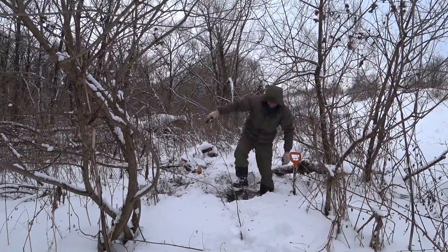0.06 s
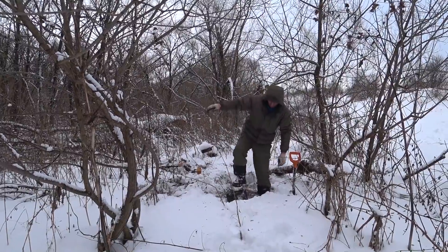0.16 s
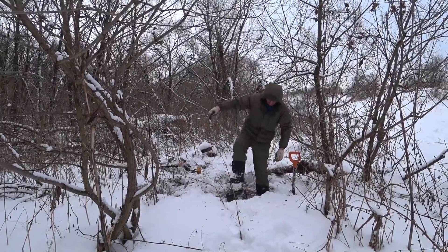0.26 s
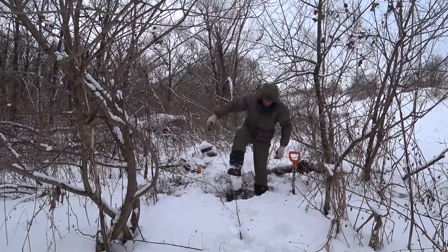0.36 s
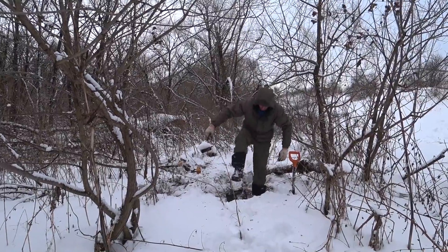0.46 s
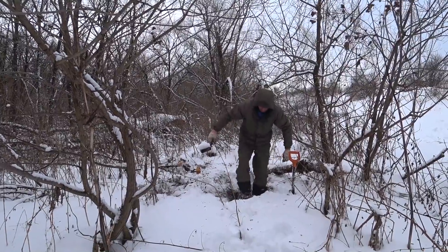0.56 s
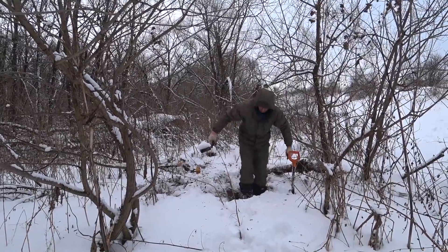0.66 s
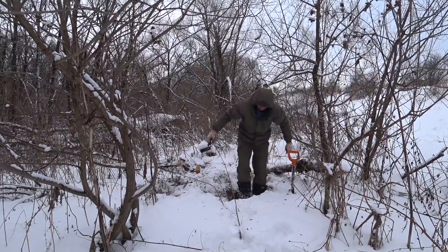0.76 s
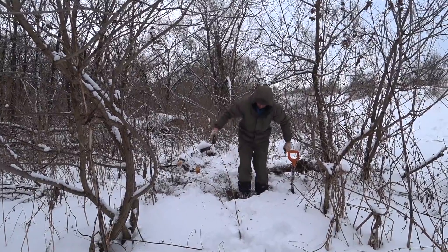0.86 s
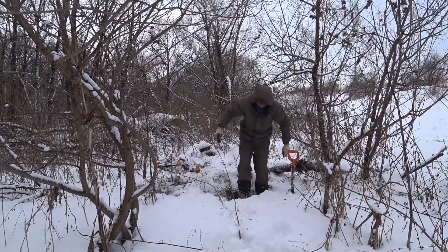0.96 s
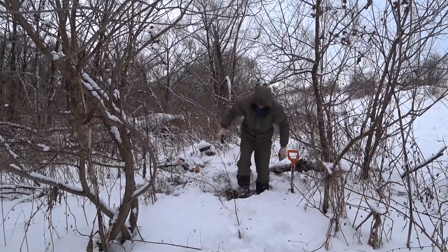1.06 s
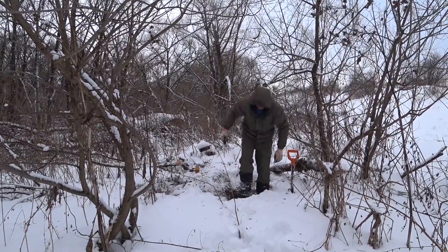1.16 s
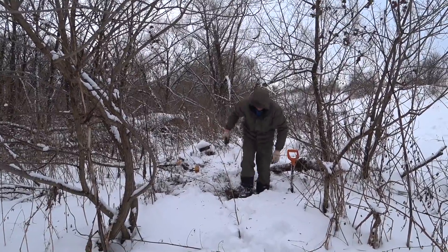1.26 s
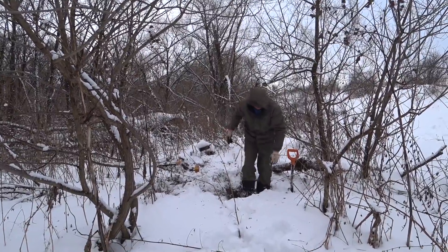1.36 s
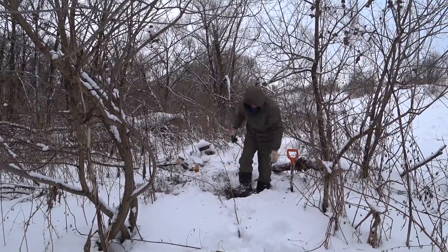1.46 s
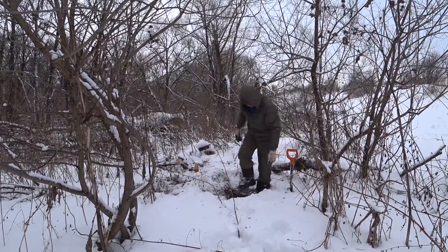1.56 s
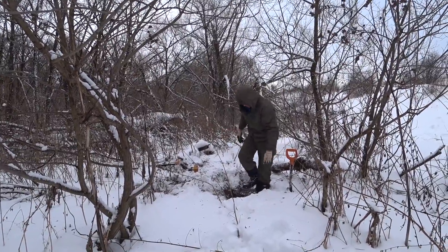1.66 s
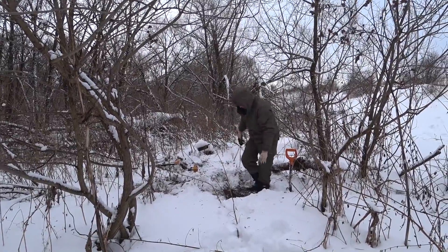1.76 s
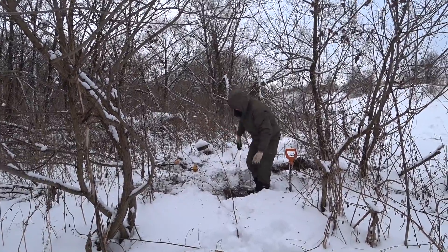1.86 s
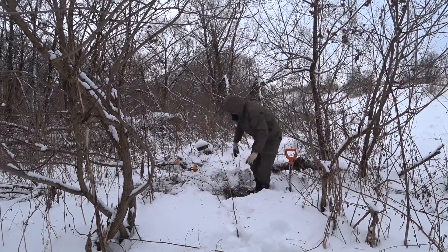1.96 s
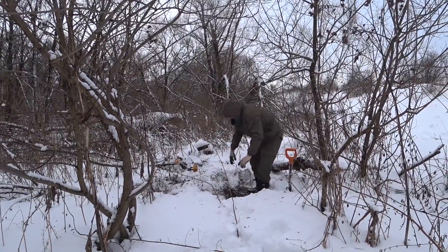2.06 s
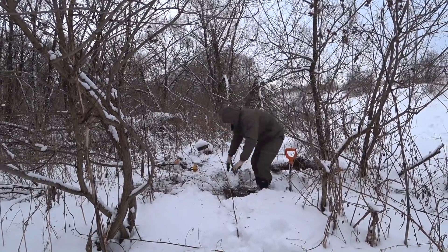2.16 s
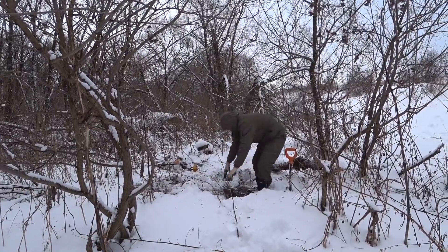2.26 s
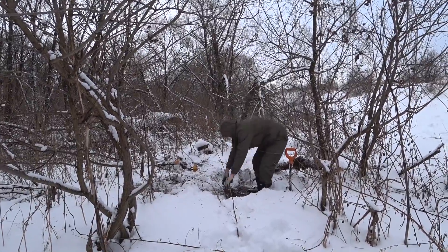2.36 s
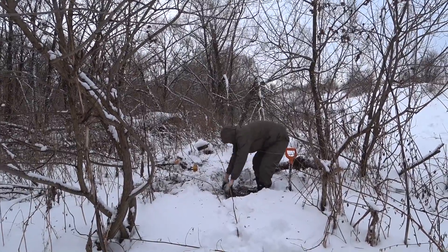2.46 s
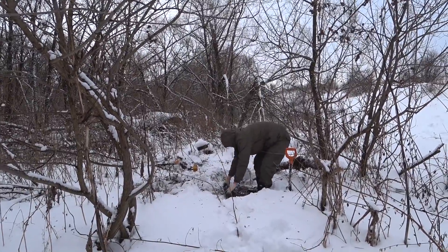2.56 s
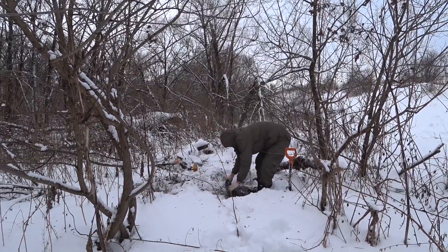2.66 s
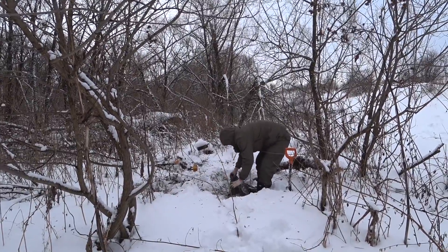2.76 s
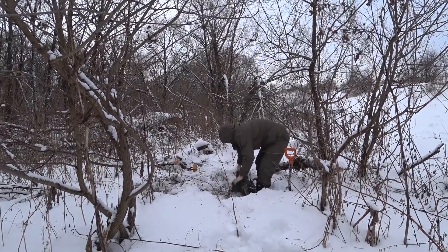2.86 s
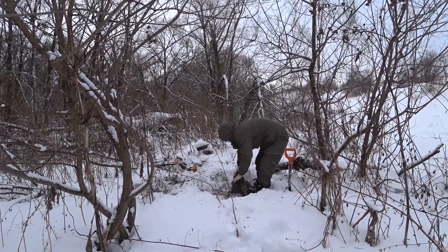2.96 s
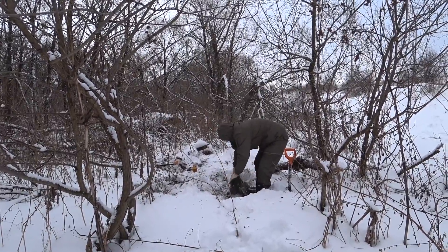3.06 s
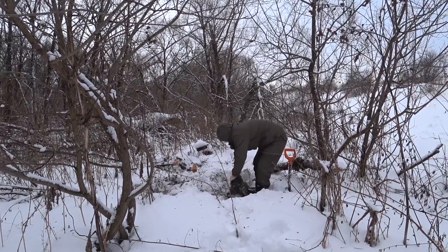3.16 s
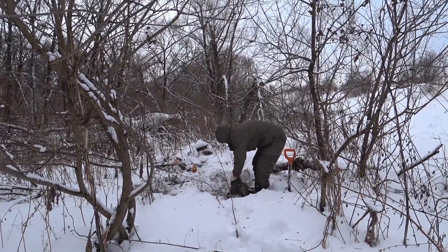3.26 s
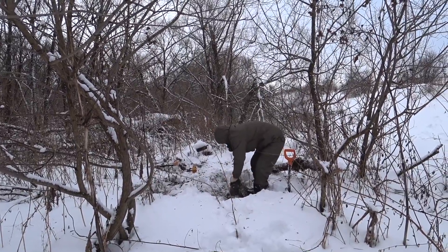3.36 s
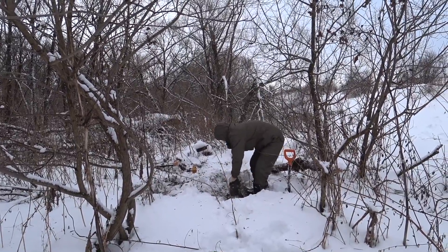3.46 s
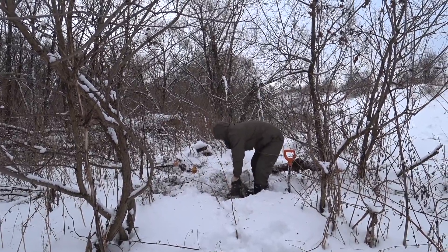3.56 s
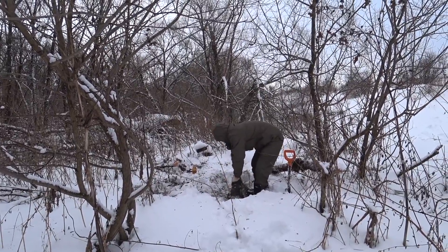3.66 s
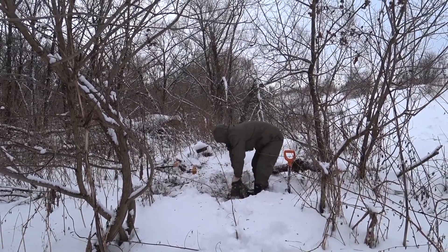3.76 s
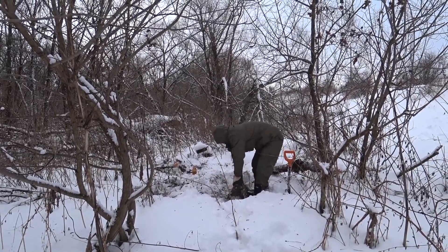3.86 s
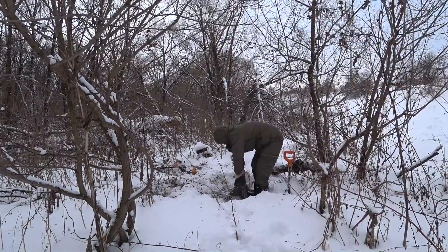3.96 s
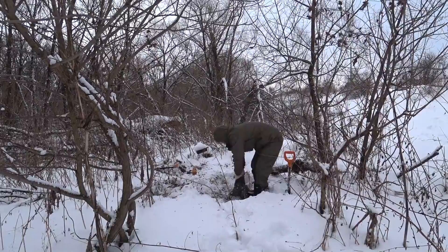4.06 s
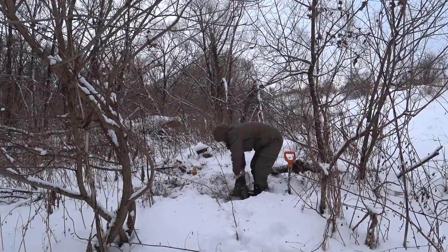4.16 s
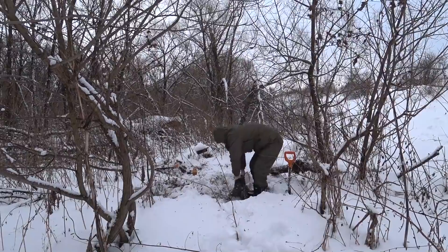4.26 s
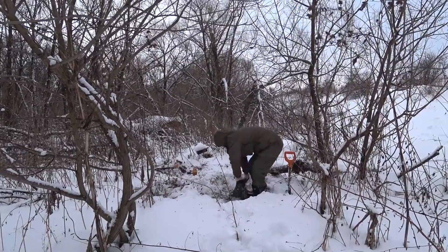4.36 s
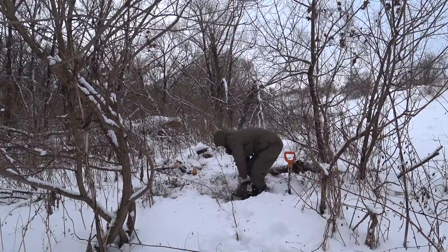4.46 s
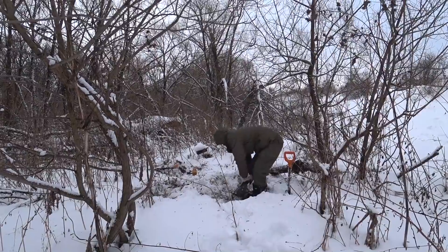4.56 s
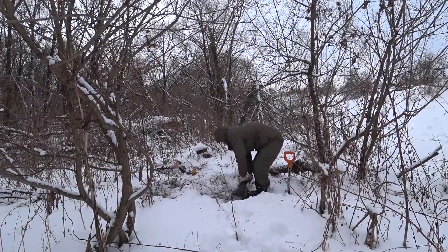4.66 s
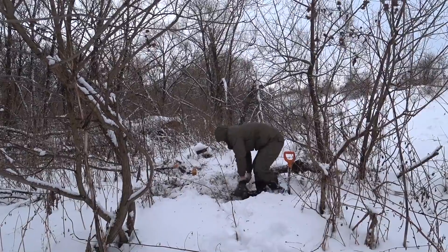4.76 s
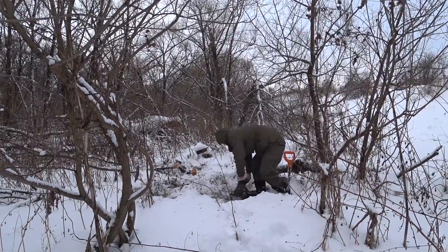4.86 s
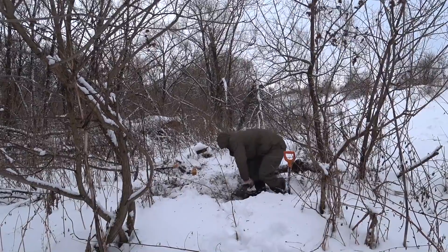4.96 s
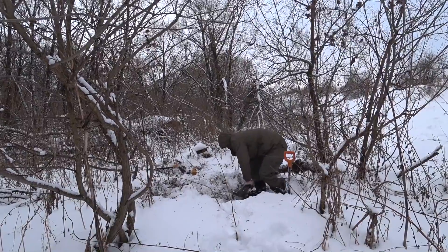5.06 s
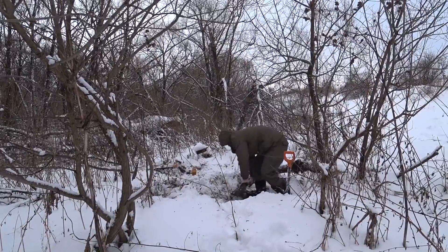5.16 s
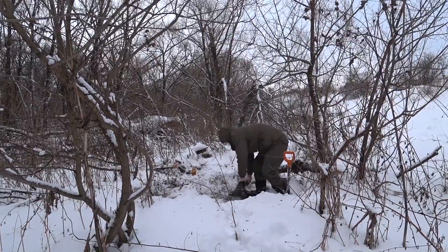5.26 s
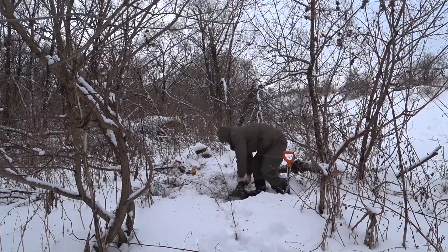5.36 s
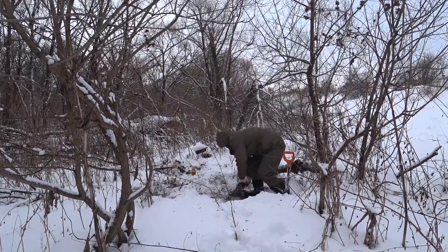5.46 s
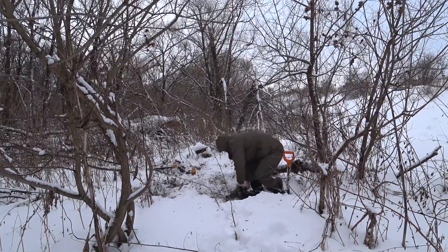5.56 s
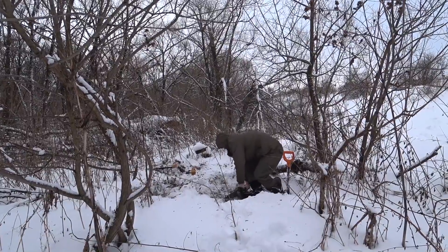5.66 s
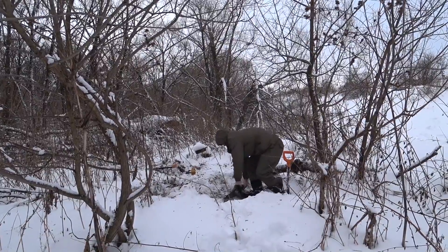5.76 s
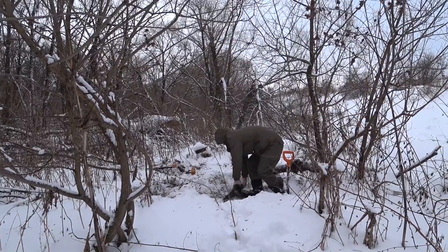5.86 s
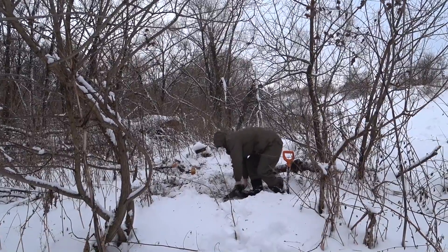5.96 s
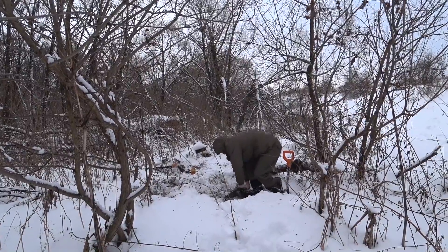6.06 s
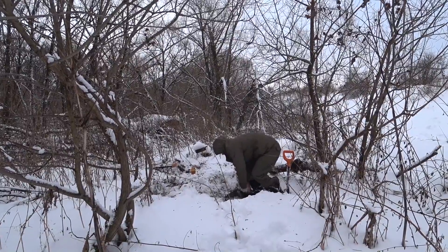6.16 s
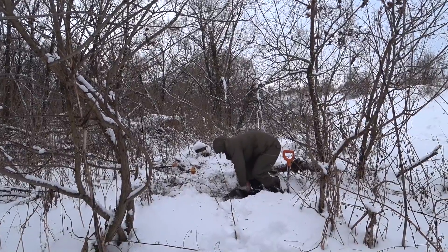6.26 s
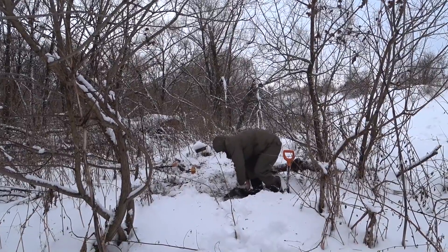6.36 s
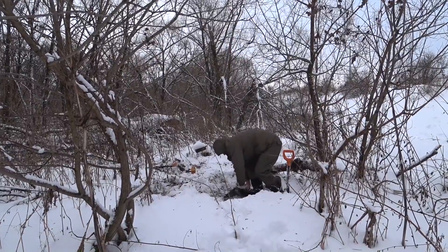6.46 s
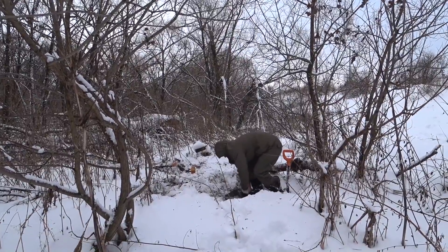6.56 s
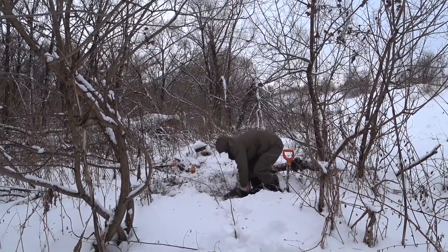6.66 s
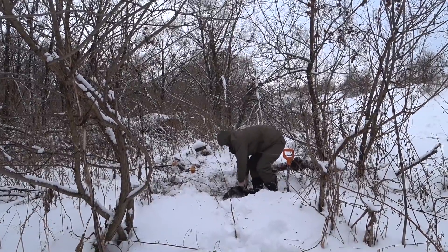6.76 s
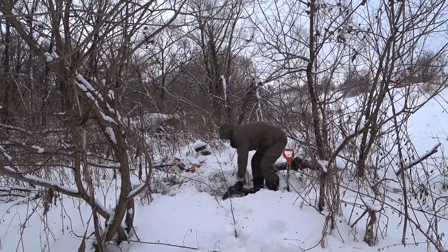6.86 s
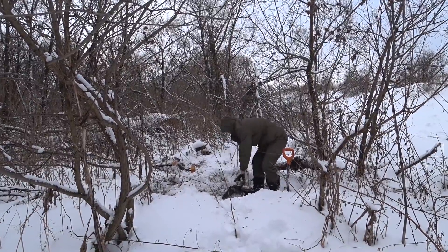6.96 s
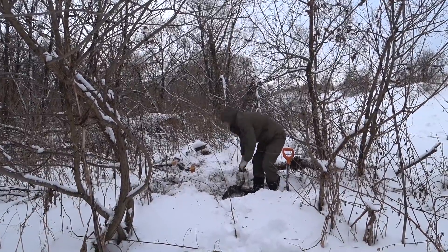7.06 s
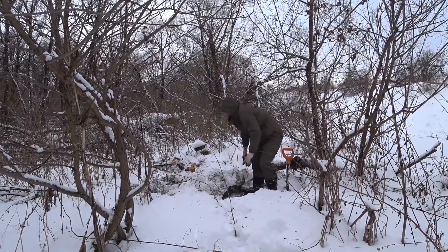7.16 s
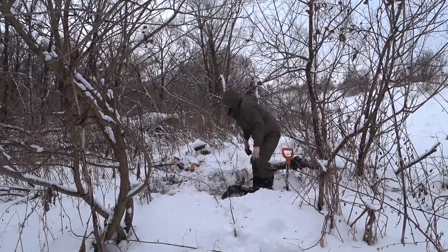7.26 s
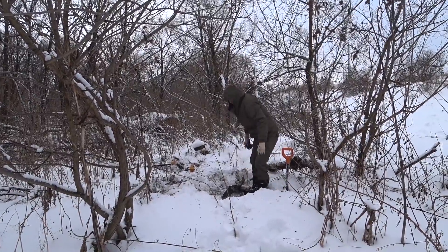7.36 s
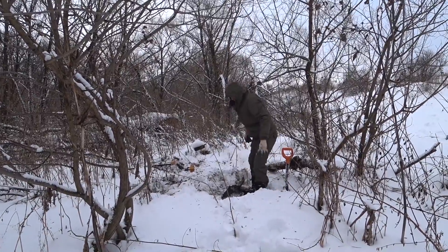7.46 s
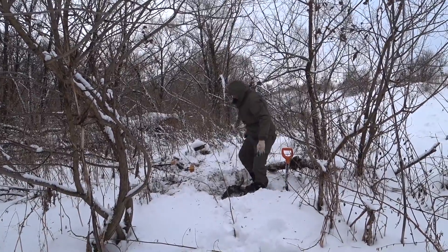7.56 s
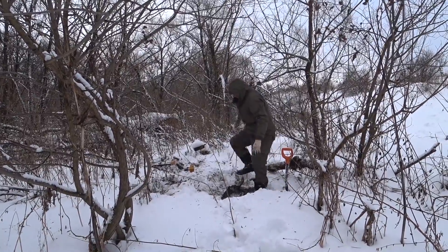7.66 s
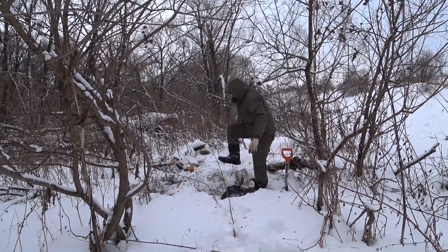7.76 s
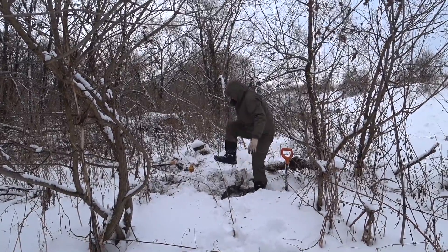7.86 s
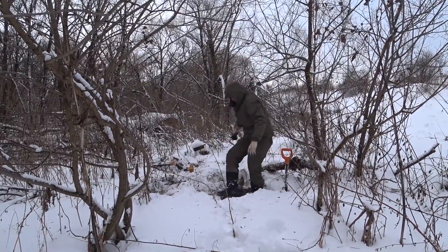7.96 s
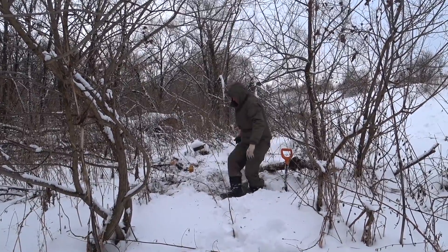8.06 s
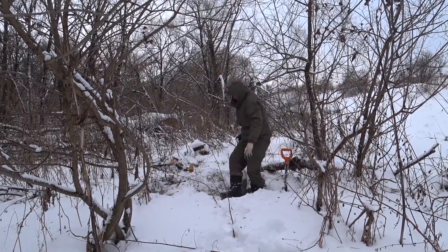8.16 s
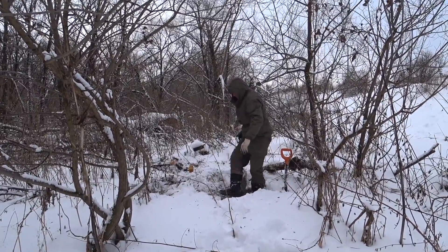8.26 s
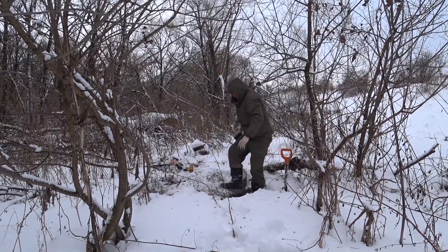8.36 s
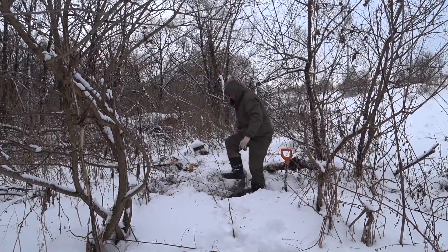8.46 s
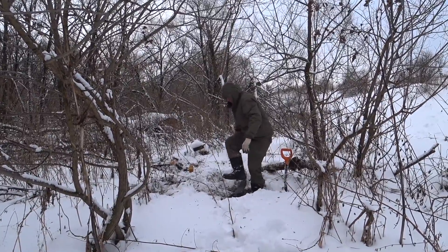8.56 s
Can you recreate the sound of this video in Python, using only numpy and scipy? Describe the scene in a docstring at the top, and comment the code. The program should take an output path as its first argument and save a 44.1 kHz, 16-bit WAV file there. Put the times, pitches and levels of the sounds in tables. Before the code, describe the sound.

Someone stamps and tugs at frozen debris in snowy woodland: hard knocks, dry cracks, crumbly spills and faint rustling, under low wind buffets.

```python
"""Someone stamps on and pulls at frozen debris in a hole in snowy woodland, a few metres away.
Each break is a quick run of shaped noise bursts, thuds, knocks and brittle snaps, and struck pieces add decaying tones.
Random grains of noise make the scrape of crumbs, snow and clothing in between.
Bare trees scatter a thin tail of decaying noise. A light wind of swelling low noise and single pulses
buffets the microphone, over a steady wash of still air."""
import sys
import numpy as np
from scipy import signal
from scipy.fft import rfft, irfft, next_fast_len
from scipy.io import wavfile

SR = 44100
rng = np.random.default_rng(int(sys.argv[2]) if len(sys.argv) > 2 else 0)


def transcribe(signal):
    """Save signal, clipped to [-1, 1], as a 16-bit WAV file at the path in sys.argv[1]."""
    frames = np.atleast_2d(signal).T
    limited = np.clip(frames, -1, 1)
    pcm = np.round(limited * 32767).astype(np.int16)
    wavfile.write(sys.argv[1], SR, pcm)


N = 380583
TIME = np.arange(N) / SR  # seconds


def undb(db):
    """Turn decibels into gain."""
    return 10 ** (np.asarray(db) / 20)


def unit(x):
    """Scale a sound to an rms level of 1."""
    return x / np.sqrt(np.mean(x ** 2) + 1e-20)


def along(points, hz):
    """Read a curve of (Hz, value) points on a log-frequency axis."""
    f, value = np.transpose(points)
    return np.interp(np.log(hz + 1), np.log(f), value)


def colour(x, points):
    """Filter a sound by a curve of (Hz, dB) points."""
    size = next_fast_len(x.shape[-1])
    gain = undb(along(points, np.fft.rfftfreq(size, 1 / SR)))
    return irfft(rfft(x, size) * gain, size)[..., :x.shape[-1]]


def causal(gain):
    """Build the response with these gains that rings only after the blow (minimum phase)."""
    cepstrum = irfft(np.log(gain))
    half = len(cepstrum) // 2
    # fold the part before the blow onto the part after it
    cepstrum[1:half] *= 2
    cepstrum[half + 1:] = 0
    return np.exp(rfft(cepstrum))


def resonances(modes, hz):
    """Add up the responses of damped modes; alternate signs keep the skirts steep."""
    response = 0
    for k, (f, width, db) in enumerate(modes):
        damping = 1j * hz * width
        response = response + (-1) ** k * undb(db) * damping / (f ** 2 - hz ** 2 + damping)
    return response


def walk(rate):
    """Wander at random with a spread near 1, joining `rate` random points per second by straight lines."""
    return 1.2 * np.interp(TIME * rate, np.arange(4096), rng.standard_normal(4096))


def swell(start, rise_s, fall_db_per_s):
    """Make an envelope that rises in a straight line and then dies away evenly in dB."""
    age = TIME - start
    return np.clip(age / rise_s, 0, 1) * undb(-fall_db_per_s * np.maximum(age - rise_s, 0))


def stereo_noise(points, spread):
    """Make coloured noise that the two microphone ports partly share."""
    mid, side = colour(rng.standard_normal((2, N)), points)
    return unit(mid + colour(side, spread) * np.array([[1], [-1]]))


def air():
    """The quiet, even wash of a winter day is steady coloured noise."""
    # Spectrum of the air. Each row: frequency in Hz, relative level in dB.
    air_colour = [(20, -7), (60, -20.5), (130, -12.5), (220, -7), (350, -15.5), (600, -18.5), (1260, -26),
                  (2500, -29.5), (6600, -31.5), (9000, -36), (15500, -38.5)]
    # Stereo width. Each row: frequency in Hz, gain of the side against the mid in dB.
    air_width = [(80, -46), (350, -2.5), (700, 3.5), (1400, 7), (2800, 3.5), (5600, -3), (11000, -4.5)]
    return stereo_noise(air_colour, air_width) * undb(-56.5)  # dB rms


def wind(wind_db=-1, flutter_db=2, buffet_db=0):
    """Gusts rise quickly and ebb slowly; their eddies rumble on the microphone, and buffets push and pull it once."""
    # Gusts. Each row: start in seconds, level in dB before wind_db, dying away in dB per second.
    gust_list = [(-.1, -31, 9), (1.56, -39, 13.5), (3.04, -48, 17.5), (5.87, -35, 16.5), (6.58, -30, 26.5),
                 (7.17, -38.5, 35), (7.87, -49, 2), (8.02, -42.5, 11)]
    # Single buffets. Each row: middle in seconds, peak in dB before buffet_db, speed in Hz.
    buffet_list = [(0.824, -26.5, 43.7), (1.054, -32.5, 62), (4.83, -37.5, 20.4), (5.904, -24.5, 38.2),
                   (6.676, -28, 38.3), (7.233, -32.5, 45.8)]
    # Spectrum of the rumble. Each row: frequency in Hz, relative level in dB.
    rumble_colour = [(10, -10.5), (18, 2), (32, 1.5), (86, -8.5), (167, -17.5), (286, -28), (600, -46),
                     (1300, -63)]
    # Stereo width. Each row: frequency in Hz, gain of the side against the mid in dB.
    rumble_width = [(25, -21), (70, -10), (200, 0)]
    calm_db, rise_s = -59, 0.052
    power = undb(calm_db) ** 2
    for start, db, fall in gust_list:
        power = power + (undb(db) * swell(start, rise_s, fall)) ** 2
    flutter = undb(wind_db + flutter_db * walk(11))
    rumble = stereo_noise(rumble_colour, rumble_width) * np.sqrt(power) * flutter
    for middle, db, hz in buffet_list:
        phase = 2 * np.pi * hz * (TIME - middle)
        # one swing each way, with its peaks at phase -1 and 1
        rumble = rumble - undb(db + buffet_db) * phase * np.exp((1 - phase ** 2) / 2)
    return rumble * undb([[-1.1], [1.1]])  # the right is a little stronger


def woods(x, far_db=-23, far_t60=0.61, side_db=-4):
    """Nearby stems scatter the sound at once; farther trunks return a thin, longer tail."""
    near_db, near_t60, build_s = -13, .045, .003
    t = np.arange(SR) / SR
    tail = 0
    for db, t60 in (near_db, near_t60), (far_db, far_t60):
        envelope = np.exp(-np.log(1000) * t / t60) * np.minimum(t / build_s, 1)
        mid, side = rng.standard_normal((2, SR)) * envelope
        echoes = unit(mid + undb(side_db) * side * np.array([[1], [-1]]))
        tail = tail + undb(db) * echoes / np.sqrt(SR)
    scattered = signal.fftconvolve(x[None], tail, axes=1)[:, :N]
    return colour(scattered, [(150, -5), (600, -2), (2000, 0), (6000, -1), (14000, -3)])


def ports(x):
    """The two microphone ports hear the hole with slightly different level and phase."""
    # Level between the ports. Each row: frequency in Hz, left minus right in dB.
    balance = [(100, 0), (380, -1), (700, -2.5), (2400, -1.5), (4400, -1.5), (12000, -1)]
    # Phase between the ports. Each row: frequency in Hz, lead of the left in radians.
    lead = [(100, .1), (430, 0.57), (1000, 1.25), (2000, 0.98), (3400, 0.88), (5500, 0.42), (8000, 0.37),
            (12000, 0.27), (16000, .05)]
    size = next_fast_len(N)
    hz = np.fft.rfftfreq(size, 1 / SR)
    # each port takes half of the difference
    lean = undb(along(balance, hz) / 2) * np.exp(.5j * along(lead, hz))
    return irfft(rfft(x, size) * np.array([lean, 1 / lean]), size)[:, :N]


def crumbs(rate, spread_db, ring_s):
    """Dense grains of very unequal size each make a brief tick of noise; `rate` is grains per second."""
    size_db = spread_db * np.minimum(rng.exponential(size=N), 5)
    sizes = undb(size_db) * (rng.random(N) < rate / SR)
    decay = np.exp(-np.arange(400) / SR / ring_s)
    power = signal.fftconvolve(sizes ** 2, decay)[:N]
    return unit(np.sqrt(np.abs(power)) * rng.standard_normal(N))


def friction():
    """Spills of crumbs die away, strokes hold and let go: gives the strengths of fine hiss and coarse scrape."""
    # Crumbs that spill after a heavy stamp or pull. Each row: start in seconds, fine hiss in dB,
    # coarse scrape in dB, time to fade by 60 dB in seconds; dB before the trims in scraping.
    spill_list = [(.612, -37.5, -38, 0.41), (1.065, -51, -59, 0.19), (1.35, -52.5, -45, 0.3),
                  (4.451, -45, -43.5, 0.27), (5.62, -51.5, -48, 0.47), (5.68, -51, -48.5, 0.42),
                  (6.151, -40, -38, .33), (6.613, -43.5, -37, 0.21), (8.041, -43.5, -44, 0.48)]
    # Strokes of boot, glove or sleeve over the snow. Each row: start in seconds, length in seconds,
    # fine hiss in dB, coarse scrape in dB; dB before the trims in scraping.
    stroke_list = [(-0.005, 0.17, -61.5, -63.5), (0.692, 0.1, -53.5, -55.5), (1.812, 0.14, -55.5, -69),
                   (2.349, 0.27, -59.5, -61.5), (2.718, 0.203, -58, -56.5), (2.955, 0.23, -58, -75),
                   (3.233, 0.051, -59, -65), (3.363, 0.066, -60.5, -57), (3.782, 0.084, -56.5, -56),
                   (4.006, 0.12, -60.5, -65), (4.58, 0.15, -65, -59), (4.983, .11, -55, -53.5),
                   (5.126, .12, -65, -62), (6.392, 0.089, -64, -59.5), (6.73, 0.084, -55, -53),
                   (7.68, 0.12, -83, -65), (7.758, .15, -62.5, -74), (8.125, 0.052, -57.5, -68),
                   (8.246, 0.15, -60, -60)]
    spill_rise_s = 0.0052
    attack_s, release_s, sag_db_per_s = 0.024, 0.021, 14
    # faint rustle of clothing between the strokes: fine, coarse (dB)
    power = undb([[-72], [-68]]) ** 2
    for start, hiss_db, grit_db, t60 in spill_list:
        spill = swell(start, spill_rise_s, 60 / t60)
        power = power + (undb([[hiss_db], [grit_db]]) * spill) ** 2
    for start, length, hiss_db, grit_db in stroke_list:
        release = np.exp(-np.maximum(TIME - start - length, 0) / release_s)
        stroke = swell(start, attack_s, sag_db_per_s) * release
        power = power + (undb([[hiss_db], [grit_db]]) * stroke) ** 2
    return np.sqrt(power)


def scraping(hiss_db=0.0, grit_db=-1):
    """Snow and cloth hiss finely while coarser frozen crumbs grate; both catch and slip together."""
    # Spectrum of the fine hiss. Each row: frequency in Hz, relative gain in dB.
    hiss_colour = [(1200, -2), (3000, 0.5), (4500, 0), (7000, 1.5), (10500, -4), (12500, -9.5),
                   (16000, -13.5)]
    # Spectrum of the coarse scrape. Each row: frequency in Hz, relative gain in dB.
    grit_colour = [(120, 1.5), (250, 1.5), (500, 4), (1000, -0.5), (1600, -5.5), (2600, -7), (4000, -36.5),
                   (9000, -33)]
    hiss = unit(colour(crumbs(rate=1500, spread_db=1.5, ring_s=0.0021), hiss_colour))
    grit = unit(colour(crumbs(rate=700, spread_db=3.0, ring_s=0.0028), grit_colour))
    slip = unit(undb(1.8 * walk(70)))
    fine, coarse = friction()
    return slip * (hiss * fine * undb(hiss_db) + grit * coarse * undb(grit_db))


def rings():
    """Each loosened piece that is struck squarely sounds its own short note, a decaying sine; the low note at
    7.23 s thumps along with a buffet of the wind."""
    # Notes. Each row: start in seconds, pitch in Hz, level in dB before build-up and decay,
    # time to fade by 60 dB in seconds.
    note_list = [(.624,770,-16,0.048), (.640,516,-4.5,0.024), (0.64,207,-24,0.034), (1.071,857,-34.5,0.058),
                 (1.353,211,-29.5,0.14), (1.494,950,-43,0.067), (3.013,2230,-40.5,0.012),
                 (3.253,272,-41.5,0.21), (4.462,158,-29.5,0.078), (4.47,1514,-28.5,0.052),
                 (5.024,495,-31.5,0.085), (5.623,654,-28.5,0.025), (5.643,490,-26.5,0.051),
                 (5.684,1630,-17,0.01), (7.061,4600,-48.5,0.014), (7.227,253,-30.5,0.035),
                 (8.051,443,-9.5,0.024), (8.047,107,-8.5,0.043)]
    t = np.arange(SR // 3) / SR
    out = np.zeros(N + len(t))
    for s, hz, db, t60 in note_list:
        start = int(s * SR)
        contact = 1 - np.exp(-t * hz)  # the note builds over its first cycle
        decay = np.exp(-np.log(1000) * t / t60)
        out[start:start + len(t)] += undb(db) * contact * np.sin(2 * np.pi * hz * t) * decay
    return out[:N]


def breaks(thud_db=0, knock_db=-2.0, snap_db=-.5, thud_stretch=0.6, fall=1.94, jagged=0.9, softness=0.45):
    """Each break is a burst of tiny fractures: its slow push thuds, the piece knocks, the fracture itself snaps."""
    # Cracks and knocks, in quick runs. Each row: start in seconds, thud in dB, knock in dB, snap in dB
    # (all before the trims above), brightness of the snap in dB, time scale of the burst in seconds
    # (the thud's is then multiplied by thud_stretch).
    break_list = [ (.603, -35, -39.5, -45, -2, 0.0063), (0.61, -29, -25, -40, -7, 0.015),
                  (.6225, -25, -26, -35, -12, 0.0014), (0.6364, -29.5, -16.5, -25, 4.5, 0.0013),
                  (.6398, -21, -32, -28.5, -6, 0.0024), (0.646, -42, -37, -34.5, 5, 0.0058),
                  (0.658, -46, -52, -35.5, -5, .004), (0.68, -40, -39.5, -40, -15, 0.0034),
                  (.703, -48, -48, -48, -9, 0.012), (0.785, -70, -55, -46, 1, 0.0019),
                  (0.818, -70, -61, -58, -15, .0015), (1.0617, -50, -44, -46.5, 1, 0.0028),
                  (1.0683, -45, -36, -38.5, -10, 0.0067), (1.348, -36, -44.5, -50.5, -12, 0.0035),
                  (1.355, -51, -50, -45, -9, 0.0095), (1.375, -40, -46, -57, -3, 0.014),
                  (1.49, -49, -50.5, -60, -2, 0.011), (2.373, -47.5, -53, -52, -3, 0.025),
                  (2.581, -53.5, -63, -56, 0, 0.0073), (2.95, -61, -63, -55.5, -1, 0.0072),
                  (3.005, -88, -49.5, -57, -25, 0.021), (3.128, -66, -58, -50.5, -7, .01),
                  (3.247, -47.5, -59, -53, -9, 0.0056), (3.871, -72, -52, -64, -3, 0.0063),
                  (4.114, -70, -60, -57.5, -1, .004), (4.4267, -52, -44, -35.5, 0.5, 0.0031),
                  (4.447, -57, -39, -37, 3, 0.0042), (4.461, -47, -37, -35, -3, 0.0032),
                  (4.47, -38.5, -34, -40, 4, 0.0063), (4.696, -51, -51, -48, 3.5, 0.015),
                  (4.88, -51.5, -54, -55, 3, 0.019), (5.0068, -39, -42.5, -53.5, -25, 0.0025),
                  (5.023, -47, -40.5, -55, -12, 0.0031), (5.0365, -38.5, -39, -56, -1, 0.0043),
                  (5.616, -50, -50, -51, -30, 0.0048), (5.641, -40.5, -39, -54, -15, 0.0067),
                  (5.6781, -42, -24, -23, 2, 0.0025), (5.7027, -45, -38.5, -42, 9, 0.0026),
                  (5.879, -54, -55, -58.5, -2, 0.0077), (6.146, -43, -35.5, -37, -3, 0.0038),
                  (6.1557, -36, -26, -27.5, -1, .0055), (6.171, -41, -31, -29.5, 4, 0.0034),
                  (6.176, -45, -36, -39, -7, 0.0033), (6.186, -42, -33, -36, 0, 0.0014),
                  (6.193, -49, -34, -29, 16, 0.0014), (6.208, -41, -34, -41, 5, 0.011),
                  (6.239, -38.5, -42, -30, 18, .0024), (6.245, -56, -48.5, -48, 29, 0.016),
                  (6.366, -57, -56, -54, 10, .0055), (6.389, -52, -45.5, -42, 11, 0.005),
                  (6.4185, -46.5, -48.5, -40.5, 10, 0.0027), (6.439, -60, -66, -60, 10, .003),
                  (6.588, -41, -41, -52, -2, 0.012), (6.602, -52.5, -35.5, -41.5, 12, 0.0055),
                  (6.61, -43, -40, -44, -22, .005), (6.626, -48, -34.5, -35, 11, .0018),
                  (6.639, -39.5, -40.5, -43, 3, .006), (6.741, -62, -58, -50, 10, .0025),
                  (6.752, -54, -50, -52, 16, 0.017), (6.785, -51, -45, -45, 6, 0.0019),
                  (6.871, -67, -56, -54.5, 5, 0.016), (7.226, -55, -58, -59, -4, 0.019),
                  (7.494, -51, -56, -60.5, -15, 0.014), (8.04, -35, -42, -51, 7, 0.0024),
                  (8.049, -27, -36, -41.5, 4, 0.017), (8.067, -45, -39, -43, 7, 0.0052),
                  (8.0805, -34.5, -31, -21.5, 11, 0.0024), (8.09, -47, -46, -38, 19, .008),
                  (8.135, -55, -50, -48, 7, .003), (8.164, -56, -58, -51.5, 9, .003),
                  (8.342, -56, -66, -51, 1, 0.0076), (8.364, -60, -55, -50.5, -9, 0.0071)]
    # Resonances of the hollow. Each row: frequency in Hz, width in Hz, relative gain in dB.
    hollow_modes = [(118, 175, -8.5), (181.5, 55, 1), (251.4, 59, 0), (365, 43, -6.5), (496, 105, -3.5)]
    # Resonances of a piece of debris. Each row: frequency in Hz before the change of size,
    # width in Hz, relative gain in dB.
    piece_modes = [(752, 25, 4), (958, 190, 4.5), (1366, 130, 2.5), (1540, 44, 5.5), (1996, 170, 1.5),
                   (2510, 127, 1), (3026, 97, -3.5)]
    # Spectrum of the snap. Each row: frequency in Hz, relative gain in dB.
    snap_colour = [(1500, -29), (2600, -7), (3100, 1), (3700, 0), (4500, 1.5), (5700, 0), (7200, -1),
                   (10600, -5), (12000, -16), (15500, -22)]
    size = 4096  # samples per break
    span = .01 * SR  # levels count the energy of a break over 10 ms
    t, hz = np.arange(size) / SR, np.fft.rfftfreq(size, 1 / SR)
    # frozen soil passes no treble
    hollow = resonances(hollow_modes, hz) / (1 + 1j * hz / 900) ** 2
    treble = along([(3500, -0.43), (15000, 0.83)], hz)
    upper = along([(700, -1.0), (2800, 0.66)], hz)
    out = np.zeros(N + size)
    for s, thud, knock, snap, bright, length in break_list:
        # noise of very uneven strength; the three parts share the unevenness
        fractures = rng.standard_normal((3, size)) * np.exp(jagged * rng.standard_normal(size))
        # no two pieces are quite the same size
        piece = resonances(piece_modes, hz * rng.uniform(.96, 1.04))
        # a dull blow, more thud than snap, leaves the upper modes of the piece quiet
        contact = causal(undb(softness * (snap - thud) * upper))
        edge = causal(undb(along(snap_colour, hz) + bright * treble))
        parts = [(hollow, thud + thud_db, thud_stretch),
                 (piece * contact, knock + knock_db, 1),
                 (edge, snap + snap_db, 1)]
        start = int(s * SR)
        for force, (body, db, stretch) in zip(fractures, parts):
            age = t / max(length * stretch, 1e-4)
            burst = force * age * np.exp(-fall * age)
            ring = irfft(rfft(burst) * body)
            out[start:start + size] += undb(db) * ring * np.sqrt(span / np.sum(ring ** 2))
    return out[:N]


def scene():
    """Mix the work at the hole, its scatter among the trees, wind and still air."""
    work = breaks() + rings() + scraping()
    return ports(work) + woods(work) + wind() + air()


def record(dry):
    """A steep low-pass filter cuts the top of the treble."""
    top_hz = 15800
    return signal.sosfilt(signal.ellip(8, .2, 70, top_hz, fs=SR, output="sos"), dry)


dry = scene()
out = record(dry)
transcribe(out)
```